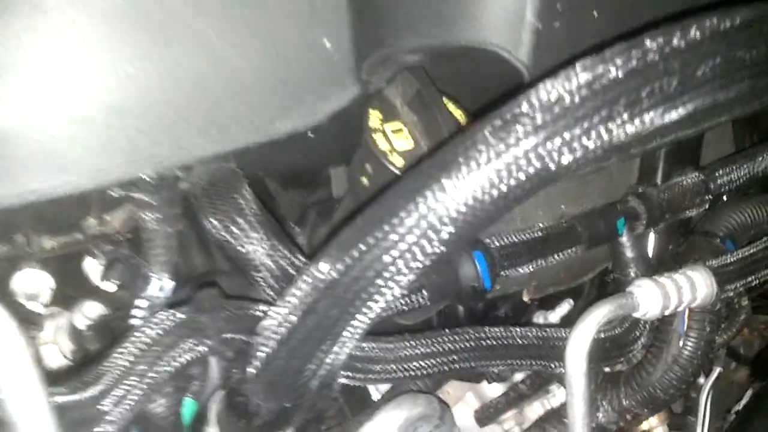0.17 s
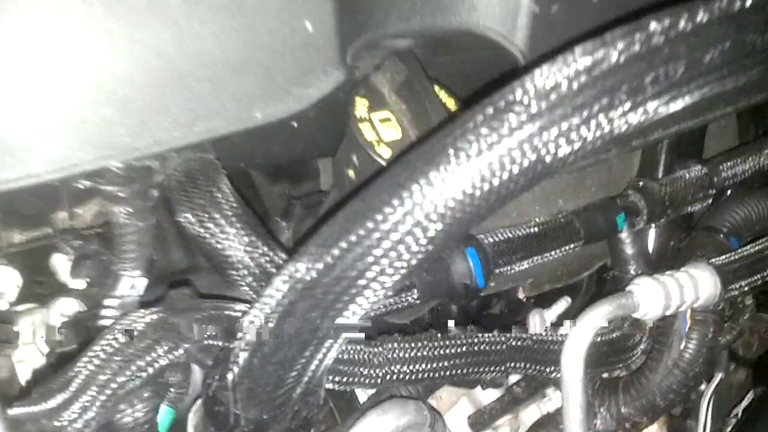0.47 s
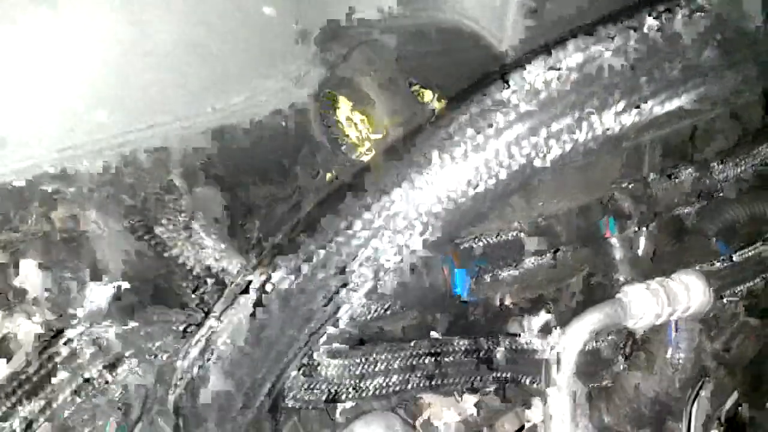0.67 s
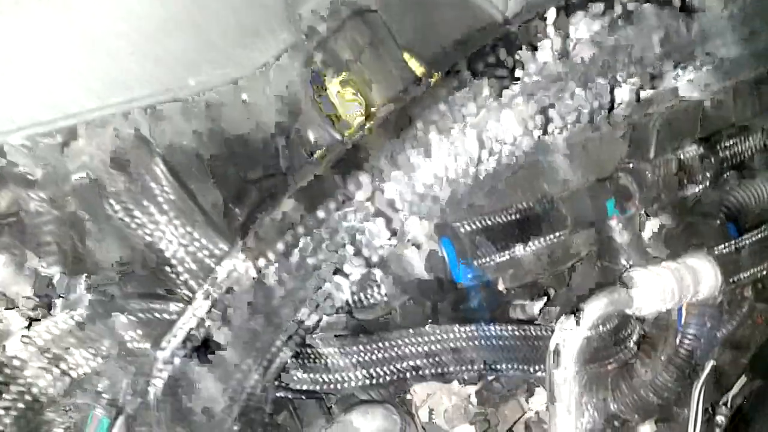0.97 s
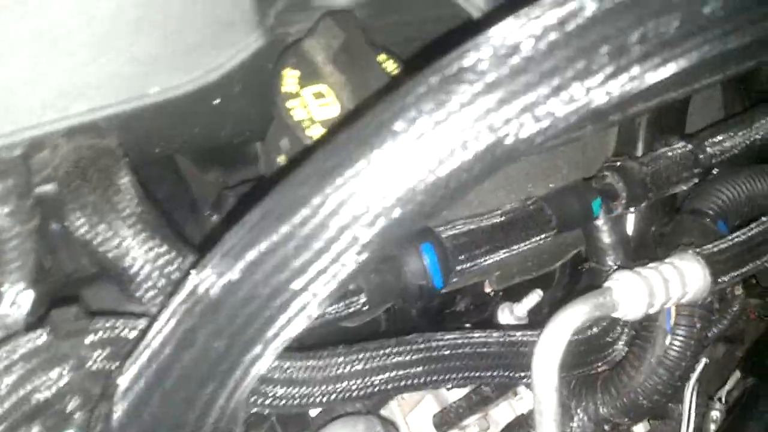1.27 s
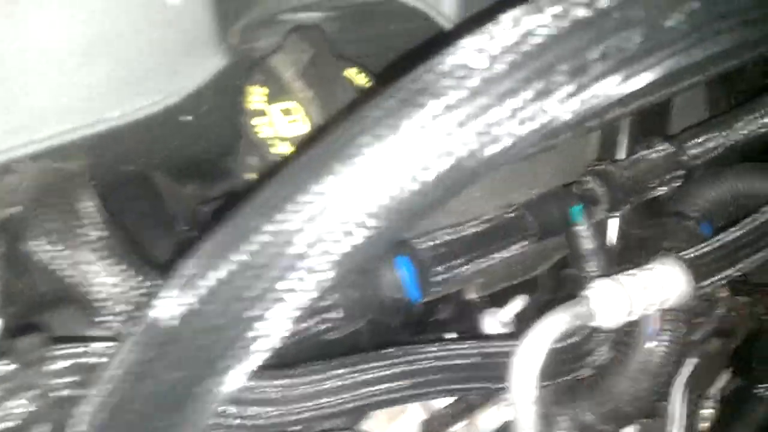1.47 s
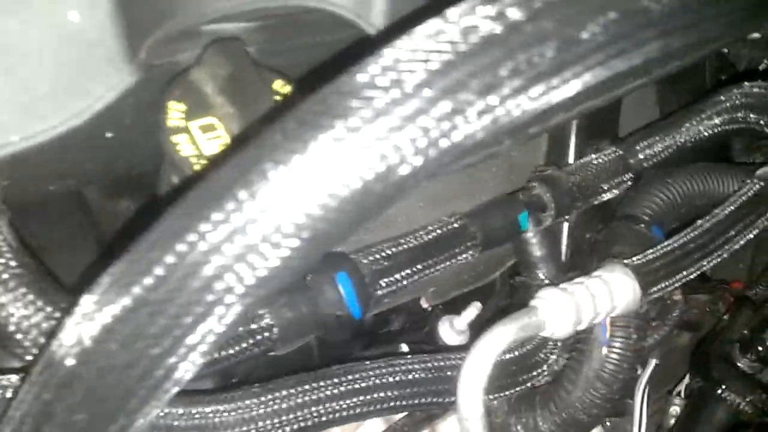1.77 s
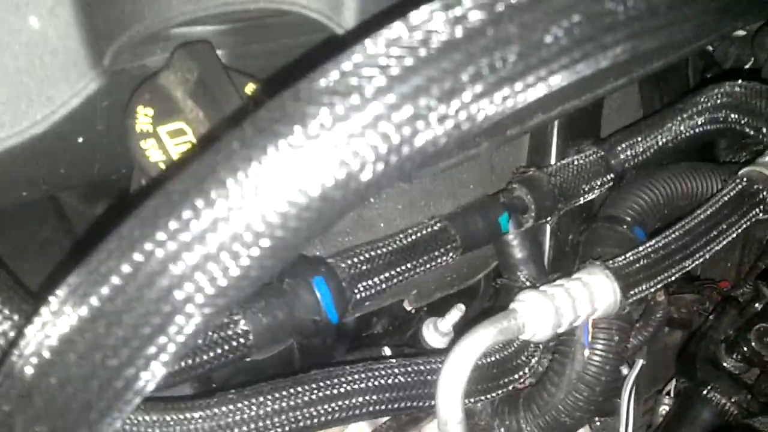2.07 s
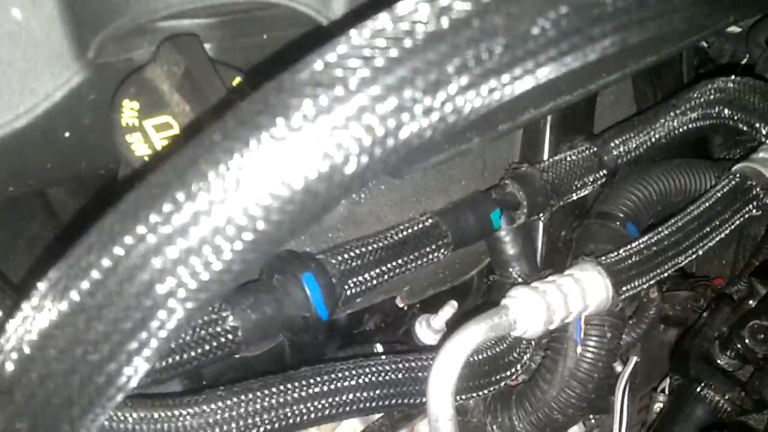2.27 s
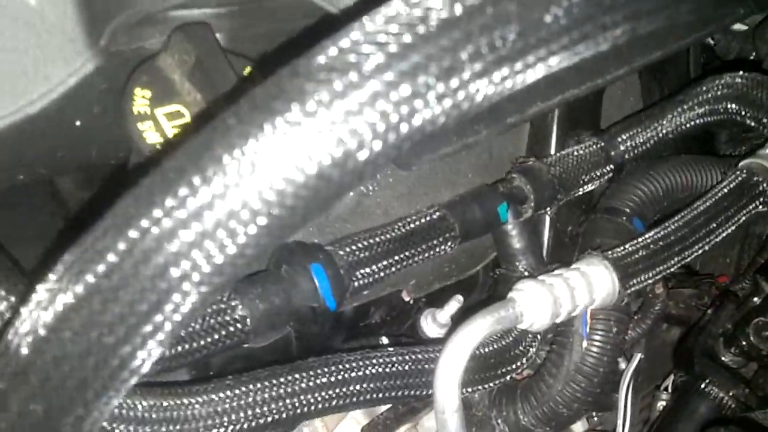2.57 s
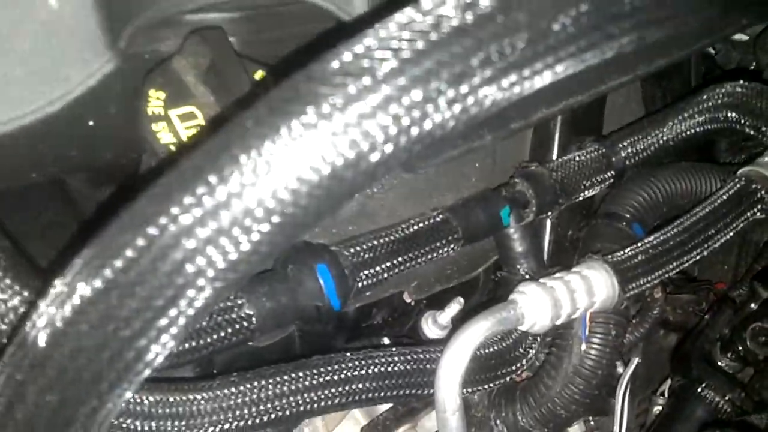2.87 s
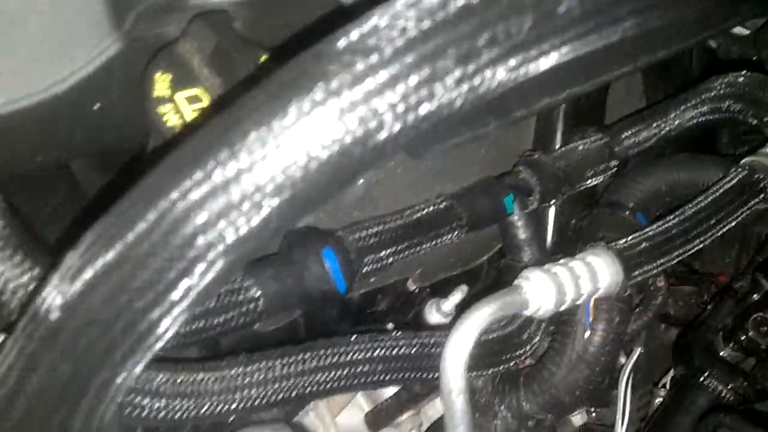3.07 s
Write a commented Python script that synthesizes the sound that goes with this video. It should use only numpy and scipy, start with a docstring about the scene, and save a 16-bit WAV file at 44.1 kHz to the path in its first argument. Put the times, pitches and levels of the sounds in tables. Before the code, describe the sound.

Close engine idle, hard regular ticks over rumbling, clattering rush, with one brief drop to silence

```python
"""A six-cylinder engine idles, heard close up in the open engine bay by two closely spaced microphones.
Once per engine cycle a loud tick snaps as a noise burst and rings the modes of the cover; a rebound
and two softer ticks, a third of a cycle apart, follow as slower bursts. Under them are harmonic firing hum,
low thuds, clatter as filtered impulses, and the rush of belts and fan as noise surging with each firing.
The sound cuts out once, briefly, and returns with a dull low bump."""
import sys
import numpy as np
from scipy import signal
from scipy.fft import rfft, irfft
from scipy.io import wavfile

SR = 44100
rng = np.random.default_rng(int(sys.argv[2]) if len(sys.argv) > 2 else 0)


def inscribe(sig):
    """Save sig as 16-bit PCM at rate SR to the path in sys.argv[1].

    A 1-D sig is mono; a 2-D sig holds one channel per row.
    Samples are clipped to [-1, 1] before scaling.
    """
    pcm = np.round(np.clip(np.atleast_2d(sig).T, -1, 1) * 32767)
    wavfile.write(sys.argv[1], SR, pcm.astype(np.int16))


N = 141561

# loud ticks, one per row: t/s, snap level/dB before colouring, cover ring level/dB, rattle hold/s
LOUD_TICKS = [(0.0956, -29.5, -25.5, .003), (0.2568, -27, -30, 0.0018), (0.419, -28, -39, 0.00086),
              (0.7477, -33, -28.5, 0.0022), (0.9074, -30.5, -27.5, 0.0031), (1.0705, -28, -28.5, .002),
              (1.234, -30, -28, 0.0013), (1.3953, -27, -31, 0.00078), (1.5555, -28, -27.5, 0.0019),
              (1.7169, -29.5, -32.5, 0.0034), (1.8781, -27, -37, 0.0029), (2.038, -27, -30.5, .002),
              (2.2015, -28.5, -31, 0.0029), (2.362, -28.5, -32.5, 0.0035), (2.5243, -27.5, -29, 0.0017),
              (2.6859, -26.5, -28.5, 0.00077), (2.8476, -28, -28, 0.0028), (3.008, -27, -34, .0015),
              (3.169, -26.5, -27, 0.0014)]
# cylinders in firing order: delay after the loud tick/s, boom level/dB, thud level/dB, growl level/dB
FIRING_ORDER = [(.005, -50.5, -35, -0.5), (.0319, -52.5, -51.5, -.5), (0.0582, -43, -40.5, -1),
                (0.0859, -45.5, -36, -.5), (0.1119, -38, -38, 0.8), (0.1394, -35.5, -37, 0.66)]
# silent interval: start/s, end/s
SILENCE_S = (.5055, .7362)
CYCLE_S = .1615  # nominal engine cycle
BAND_EDGE_HZ = 15830


def amp(db):
    """Level law: converts decibels to amplitude gain."""
    return 10 ** (np.asarray(db) / 20)


def unit(x):
    """Normalisation: scales a signal to rms 1."""
    return x / np.sqrt(np.mean(abs(x) ** 2) + 1e-20)


def bins():
    """Discrete spectrum: bin frequencies in Hz of the zero-padded, double-length transform."""
    return np.fft.rfftfreq(2 * N, 1 / SR)


def read(points):
    """Logarithmic frequency scale: interpolates a curve at every spectral bin."""
    f, value = np.transpose(points)
    return np.interp(np.log(bins() + 1), np.log(f), value)


def colour(x, db):
    """Minimum phase: the Hilbert transform of the log gain gives the phase of a causal filter."""
    log_gain = np.log(amp(np.r_[db, db[-2:0:-1]]))
    response = np.exp(np.conj(signal.hilbert(log_gain)))[:N + 1]
    return irfft(rfft(x, 2 * N) * response)[..., :N]


def add(mix, s, sound):
    """Superposition: mixes a sound in at time s, trimmed at both ends."""
    at = round(s * SR)
    sound = sound[..., max(-at, 0):]
    part = mix[..., max(at, 0):][..., :sound.shape[-1]]
    part += sound[..., :part.shape[-1]]


def drift(hz):
    """Narrow-band noise: 24 random rotations with frequency spread hz make a slow complex signal."""
    t = np.arange(0, N, 200)
    f, phase = rng.normal(0, hz, (24, 1)), rng.random((24, 1))
    rotations = np.exp(2j * np.pi * (f * t / SR + phase))
    return np.interp(np.arange(N), t, unit(rotations.sum(0)))


def cycles():
    """Periodicity: numbers the cycles marked by loud ticks, one more at each end, with start times."""
    s = np.array(LOUD_TICKS)[:, 0]
    s = np.r_[s[0] - CYCLE_S, s, s[-1] + CYCLE_S]
    whole_cycles = np.round(np.diff(s) / CYCLE_S)
    return np.r_[0, np.cumsum(whole_cycles)], s


def bump():
    """Damped oscillation: a dull low tone decays exponentially from the end of the silence."""
    level_db, hz, t60_s = -37, 55, 0.04
    t = np.maximum(np.arange(N) / SR - SILENCE_S[1], 0)
    return amp(level_db - 60 * t / t60_s) * np.sin(2 * np.pi * hz * t)


def hum(turns):
    """Harmonic series: wavering tones stand at whole multiples of the cycle rate."""
    # firing orders: multiple of the cycle rate, steady rms level/dB before the bass level curve
    orders = [(12, -72.5), (24, -55.5), (30, -55.5), (38, -51), (40, -54), (42, -52.5), (48, -56),
              (57, -49)]
    waver, waver_hz = .35, 4  # rms relative to the steady tone, frequency spread
    out = np.zeros((2, N))
    for order, db in orders:
        tone = amp(db) * np.sqrt(2) * np.exp(2j * np.pi * round(order) * turns)
        for port in out:
            steady = np.exp(2j * np.pi * rng.random())
            port += (tone * (steady + waver * drift(waver_hz))).real
    return out


def thuds():
    """Impulse response: each firing pushes the block into a boom and a higher thud, swelling and dying."""
    boom_hz, boom_rise_s, thud_hz, thud_rise_s = 171.4, 0.0089, 259, 0.012
    vary_db, jitter_s = 1.5, .0002
    first_port_db = -10  # relative to the second port
    out, t = np.zeros(N), np.arange(4000) / SR

    def push(hz, rise):
        """Modulation: a sine under an envelope that reaches 1 at the rise time."""
        return (t / rise * np.exp(1 - t / rise)) ** 2 * np.sin(2 * np.pi * hz * t)

    boom, thud = push(boom_hz, boom_rise_s), push(thud_hz, thud_rise_s)
    number, start = cycles()
    for cycle in range(int(number[-1])):
        for delay, boom_db, thud_db, _ in FIRING_ORDER:
            late, boom_vary, thud_vary = rng.standard_normal(3)
            s = np.interp(cycle + delay / CYCLE_S, number, start) + jitter_s * late
            boom_gain = amp(boom_db + vary_db * boom_vary)
            thud_gain = amp(thud_db + vary_db * thud_vary)
            add(out, s, boom_gain * boom + thud_gain * thud)
    return np.array([amp(first_port_db) * out, out])


def growl_db(turns):
    """Amplitude modulation: the noise level surges with each firing, unevenly among the cylinders."""
    pulse_db, delay_s, waver_db, waver_hz = 0.5, 0.01, 1.43, 14
    delay, _, _, db = np.transpose(FIRING_ORDER)
    angle = turns - delay_s / CYCLE_S
    uneven = np.interp(angle, delay / CYCLE_S, db, period=1)
    pulse = np.cos(2 * np.pi * len(FIRING_ORDER) * (angle - delay[0] / CYCLE_S))
    return uneven + pulse_db * pulse + waver_db * drift(waver_hz).real


def rush():
    """Broadband noise: belts and fan make a steady random flow, independent at the two ports."""
    return amp(-2.5) * rng.standard_normal((2, N))


def clatter(count=72):
    """Impact and reverberation: valves and chain knock at fixed crank angles, echoing in the bay."""
    level_db, spread_db, vary_db, jitter_s = -3.5, 1, 2.5, .00035  # level before the engine colour
    top_hz, bay_t60_s, bay_db = 4340, 0.055, 3.5  # lowpass corner; echo relative to the direct knocks
    number, start = cycles()
    angle = (np.arange(count) + rng.random(count)) / count
    size_db = spread_db * rng.uniform(-np.sqrt(3), np.sqrt(3), count)
    sign = rng.choice([-1., 1.], (2, count))
    knocks = np.zeros((2, N))
    for cycle in range(int(number[-1])):
        late, vary = rng.standard_normal((2, count))
        s = np.interp(cycle + angle, number, start) + jitter_s * late
        at = (s * SR).astype(int)
        heard = (at >= 0) & (at < N)
        knocks[:, at[heard]] += (sign * amp(size_db + vary_db * vary))[:, heard]
    t = np.arange(2048) / SR
    bay = rng.standard_normal((2, len(t))) * amp(-60 * t / bay_t60_s)
    bay /= np.linalg.norm(bay[0])
    echo = signal.fftconvolve(knocks, bay, axes=1)[:, :N]
    knocks = unit(knocks + amp(bay_db) * echo)
    return amp(level_db) * colour(knocks, -10 * np.log10(1 + (bins() / top_hz) ** 4))


def engine():
    """Source and filter: clatter and rush surge through the resonant block, over hum and thuds."""
    # colour of the running engine: f/Hz, gain/dB
    body = [(30, -61.5), (60, -54.5), (95, -43.5), (125, -30), (170, -29), (215, -28), (310, -24.5),
            (380, -23), (490, -21), (580, -22.5), (720, -20.5), (830, -23.5), (950, -26.5), (1180, -24),
            (1450, -29.5), (1750, -25), (2000, -23.5), (2300, -25), (2600, -32.5), (3100, -28),
            (3600, -34.5), (4300, -32.5), (5200, -34), (6100, -32.5), (6900, -34.5), (8500, -39.5),
            (12000, -38), (15500, -35)]
    # resonances of the castings: f/Hz, width/Hz at half the dB lift, lift/dB
    castings = [(503, 33, 5.5), (597, 15, 3.5), (711, 18.3, 6), (1110, 56, 2.5), (1223, 20, 5),
                (1372, 53, 6.5), (1517, 40, 6), (2142, 50, 2), (2280, 25, 10.5), (3802, 61, 8.5),
                (6390, 75, 8.5)]
    # level of clatter and rush: t/s, gain/dB
    swell = [(0, 0.5), (.26, 0.5), (.5, -1.5), (.75, -1), (1.6, -1.5), (1.87, 0), (2.27, -3), (2.6, -2),
             (3.03, 0.5), (3.2, -1)]
    # level of hum and thuds: t/s, gain/dB
    bass_level = [(0, -0.5), (.25, -1.5), (.5, 0), (.8, -5), (1.15, -2), (1.55, -3), (1.83, 1.5),
                  (2.05, -0.5), (2.3, -4.5), (2.65, -1), (2.9, 0), (3.2, 0)]
    rush_surge = 0.73  # share of the firing surge, in dB, that the rush takes
    t = np.arange(N) / SR
    number, start = cycles()
    turns = np.interp(t, start, number)
    body_db = read(body)
    for hz, width, db in castings:
        body_db = body_db + db / (1 + (2 * (bins() - hz) / width) ** 2)
    bass = (hum(turns) + thuds()) * amp(np.interp(t, *np.transpose(bass_level)))
    surge = growl_db(turns)
    noise = rush() * amp(rush_surge * surge) + clatter() * amp(surge)
    return colour(noise, body_db) * amp(np.interp(t, *np.transpose(swell))) + bass


def snap(db, rise, hold, t60):
    """Impact noise: a hard first contact and a gritty decaying rattle, partly coherent at the ports."""
    grain_db, contact_db, contact_s = 2.5, 5, .0015  # contact lift over the rattle and its decay time
    shared = 0.12  # share of power common to both ports
    t = np.arange(3000) / SR
    grit = unit(amp(grain_db * np.repeat(rng.standard_normal(150), 20)))  # level steps of 20 samples
    noise = rng.standard_normal((3, len(t)))
    ports = np.sqrt(shared) * noise[0] + np.sqrt(1 - shared) * noise[1:]
    contact = contact_db * np.exp(-t / contact_s)
    decay = 60 * np.maximum(t - rise - hold, 0) / t60
    return amp(db + contact - decay) * np.minimum(t / rise, 1) ** .5 * grit * ports


def ring(db, size=400):
    """Modal synthesis: the struck cover sounds as damped sines, slightly altered at each knock."""
    # modes of the cover: f/Hz, relative level/dB, t60/s
    cover = [(1550, -9, 0.032), (1630, -11.5, 0.018), (1778, -2.5, 0.025), (2027, 1.5, 0.06),
             (2190, 0, 0.04), (2325, -4, 0.0077), (2440, 5.5, 0.033)]
    rise_s, scatter, vary_db = 0.0028, .02, 1  # scatter is relative to the mode frequency
    t = np.arange(3000) / SR
    modes = np.zeros((2, len(t)))
    for hz, level, t60 in cover:
        vary, detune = rng.standard_normal(2)
        turns = hz * (1 + scatter * detune) * t + rng.random((2, 1))
        modes += amp(level + vary_db * vary - 60 * t / t60) * np.sin(2 * np.pi * turns)
    knock = np.minimum(t / rise_s, 1) ** 2 * modes
    return amp(db) * knock / np.std(knock[:, :size])  # db is the level of the first samples


def ticking():
    """Repeated impact: each marked cycle has a tick with cover ring, a rebound and two soft ticks."""
    # colour of every snap: f/Hz, gain/dB
    snap_colour = [(200, -17), (900, -6), (2000, 0), (3000, -2), (4500, -2.5), (7000, -2.5), (9000, -2.05),
                   (11000, 0.5), (15000, 4.5)]
    # rebound, then two neighbouring cylinders: delay after the loud tick/s,
    # level/dB before colouring, rise/s, t60/s
    soft_ticks = [(.007, -35.5, .003, 0.044), (.055, -37.5, .007, 0.034), (.111, -36.5, 0.0043, .06)]
    snap_rise_s, snap_t60_s, ring_delay_s = .0006, .04, 0.001026
    soft_hold_s, soft_vary_db, soft_jitter_s = 0.0021, 1.7, .0015
    soft_tilt_db = -2  # per octave, about the band edge
    loud, soft, rings = np.zeros((3, 2, N))
    for s, snap_db, ring_db, hold in LOUD_TICKS:
        add(loud, s, snap(snap_db, snap_rise_s, hold, snap_t60_s))
        add(rings, s + ring_delay_s, ring(ring_db))
    for s in cycles()[1]:
        for delay, db, rise, t60 in soft_ticks:
            late, vary = rng.standard_normal(2)
            tick = snap(db + soft_vary_db * vary, rise, soft_hold_s, t60)
            add(soft, s + delay + soft_jitter_s * late, tick)
    octaves = np.log2((bins() + 1) / BAND_EDGE_HZ)
    snap_db = read(snap_colour)
    return colour(loud, snap_db) + colour(soft, snap_db + soft_tilt_db * octaves) + rings


def scene():
    """Superposition: engine noise and ticking add at the two microphone ports."""
    return engine() + ticking()


def stereo_pair(x):
    """Pressure gradient: each channel is one port minus the delayed other port, equalised flat."""
    # likeness of the two ports, clipped below to within 0.995 of zero: f/Hz, correlation
    port_likeness = [(30, 0.77), (130, 1.26), (260, 0.88), (700, 0.8), (1150, -0.23), (1600, -0.53),
                     (2000, -0.03), (2450, 0.36), (3100, 0.27), (4000, 0)]
    # gain of the first port over the second: f/Hz, gain/dB
    near_port = [(260, -3), (1000, -4.5), (2000, -6), (2800, -1), (6300, 6), (8000, 1), (11500, 4),
                 (15000, -9.5)]
    # channel balance: f/Hz, left over right/dB
    balance = [(60, 2.5), (150, 0), (300, 3.5), (550, 2.5), (900, 1), (1500, -0.9), (15000, 0)]
    port_delay_s = 16 / 44100
    a, b = rfft(x, 2 * N)
    near = amp(read(near_port))
    same = np.clip(read(port_likeness), -.995, .995)
    # weighting sum and difference sets the correlation of the ports
    both = (near * a + b) * np.sqrt(1 + same)
    apart = (near * a - b) * np.sqrt(1 - same)
    delay = np.exp(-2j * np.pi * bins() * port_delay_s)
    mid, side = both * (1 - delay), apart * (1 + delay)
    flat = 2 * np.sqrt((near ** 2 + 1) * (1 - same * delay.real))
    lean = amp(read(balance) / 2)
    channels = np.array([(mid + side) * lean, (mid - side) / lean])
    return irfft(channels / flat)[:, :N]


def record(dry):
    """Gating and band limiting: the stereo pair falls silent briefly, a bump follows, then a lowpass."""
    t = np.arange(N) / SR
    live = (t < SILENCE_S[0]) | (t > SILENCE_S[1])
    lowpass = signal.firwin(611, BAND_EDGE_HZ, window=("kaiser", 8), fs=SR)
    return signal.oaconvolve(stereo_pair(dry) * live + bump(), lowpass[None], "same")


dry = scene()
out = record(dry)
inscribe(out)
```